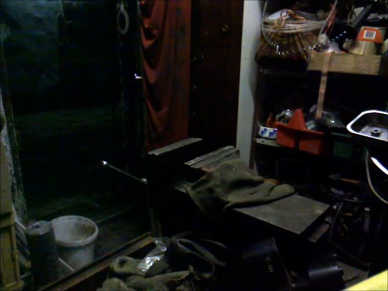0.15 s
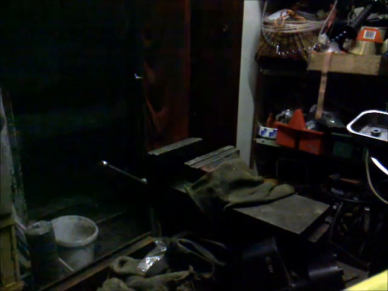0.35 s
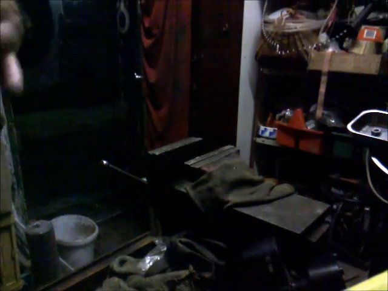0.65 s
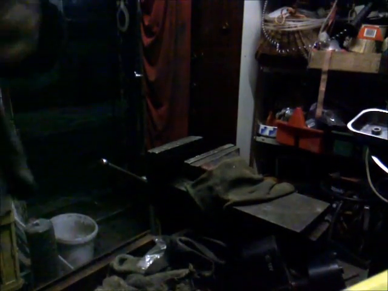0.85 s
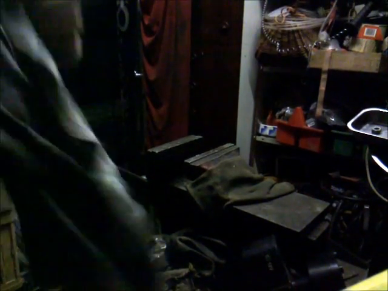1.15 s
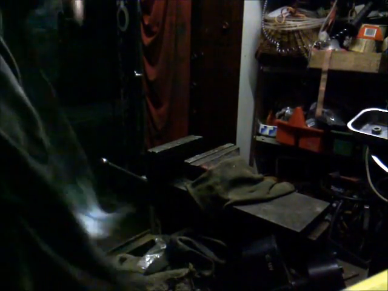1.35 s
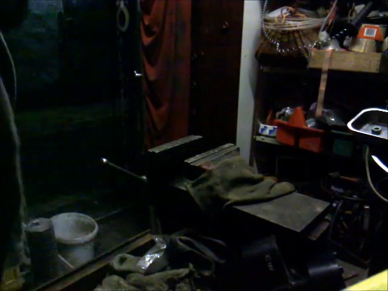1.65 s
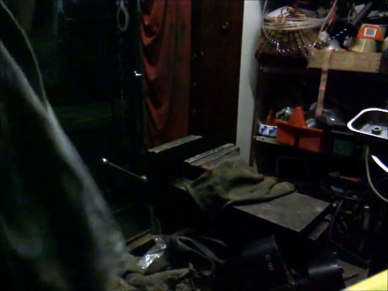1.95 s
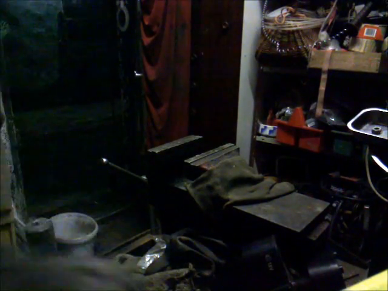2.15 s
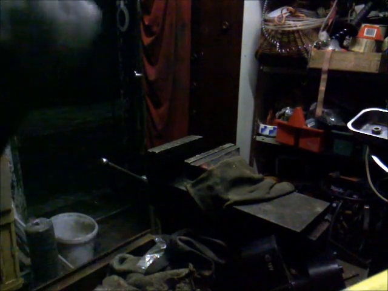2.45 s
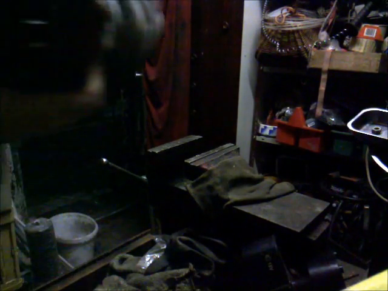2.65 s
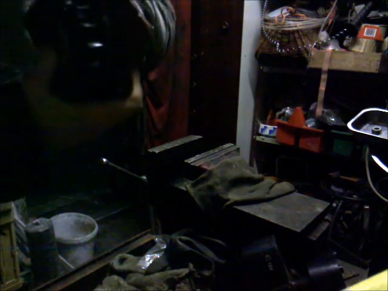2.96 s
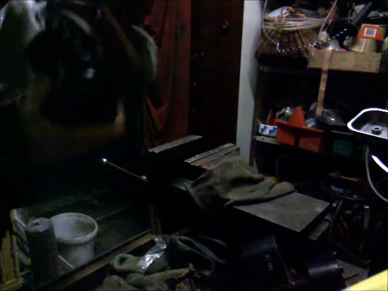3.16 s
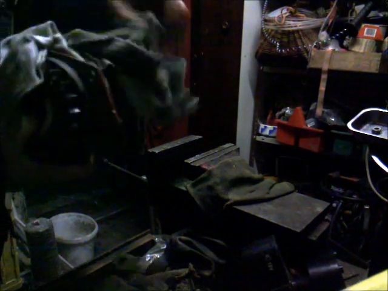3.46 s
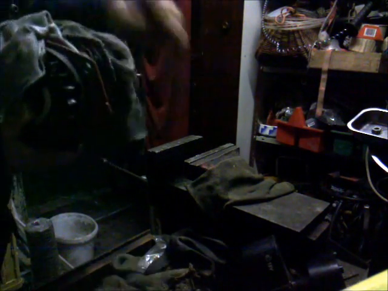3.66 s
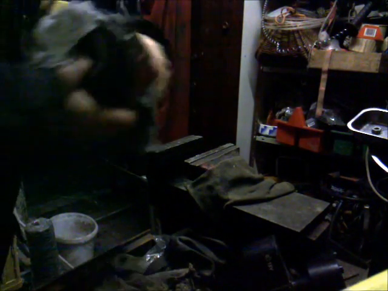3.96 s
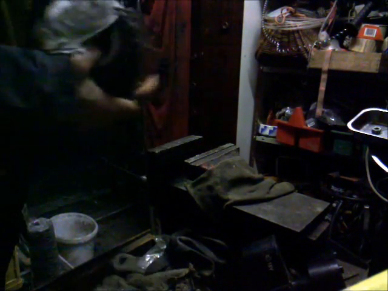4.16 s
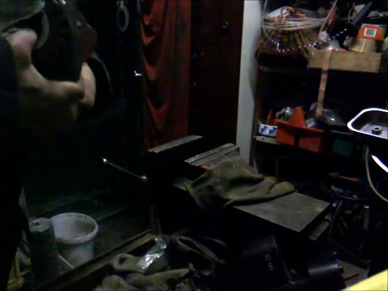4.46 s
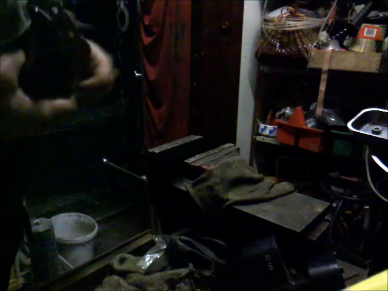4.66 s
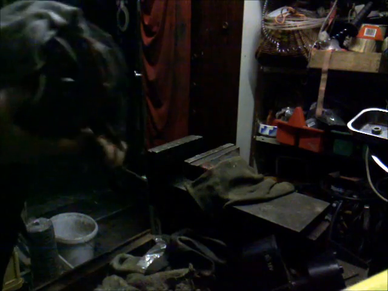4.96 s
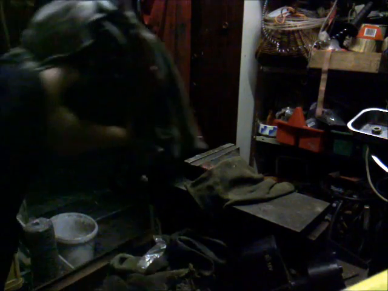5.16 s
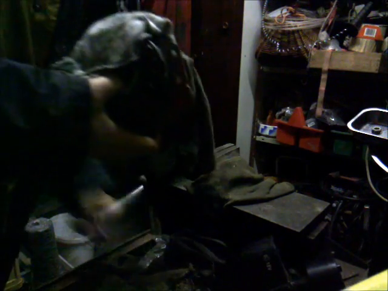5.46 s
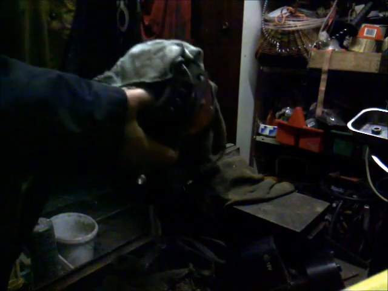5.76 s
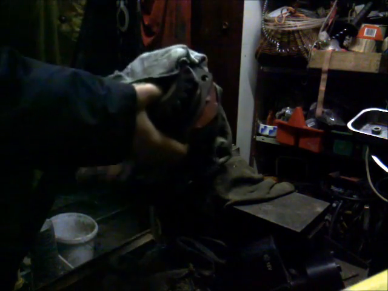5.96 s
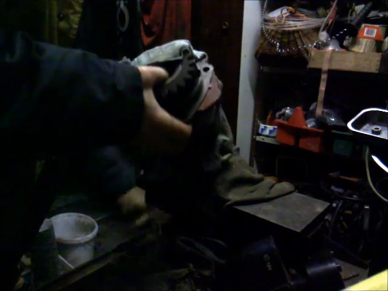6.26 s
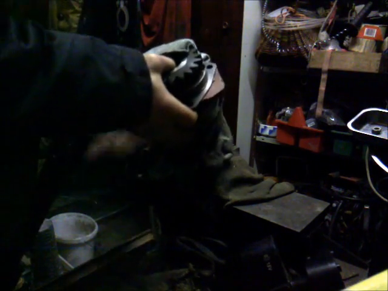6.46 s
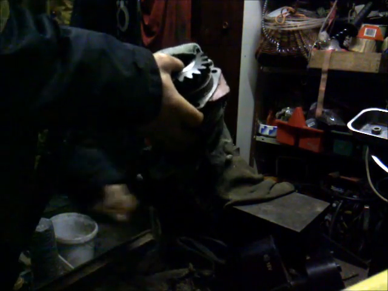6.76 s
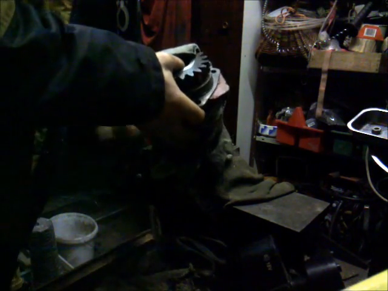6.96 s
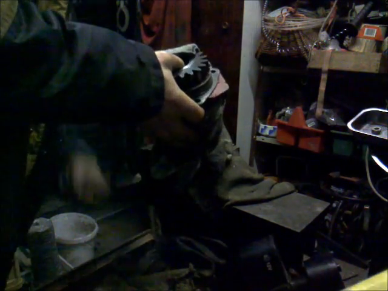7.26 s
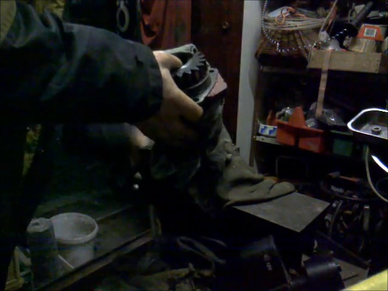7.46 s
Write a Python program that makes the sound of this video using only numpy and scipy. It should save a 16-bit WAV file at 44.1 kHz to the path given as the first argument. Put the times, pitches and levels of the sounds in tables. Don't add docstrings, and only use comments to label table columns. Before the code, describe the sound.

In a small cluttered workshop, a heavy steel part lands on a bench with a short ringing knock. Rag and sleeves rustle over metal with faint taps for several seconds. Then gears held in the hand are turned in jerky bursts, their teeth catching and grinding dully with clunks and a few bare clinks. Close, slightly hissy small camera microphone, very little echo.

```python
import sys
import numpy as np
from scipy import signal
from scipy.fft import rfft, irfft, next_fast_len
from scipy.io import wavfile
from scipy.ndimage import uniform_filter1d, map_coordinates

SR = 44100
rng = np.random.default_rng(int(sys.argv[2]) if len(sys.argv) > 2 else 0)


def wrap_up_sound(samples):
    columns = np.atleast_2d(samples).T
    tamed = np.clip(columns, -1, 1)
    steps = np.round(tamed * 32767).astype(np.int16)
    wavfile.write(sys.argv[1], SR, steps)


def invert_db(x):
    u = np.asarray(x, float) / 20
    return 10 ** u


N = 335601
CONTROL_STEP = 64

# pitch [Hz], level [dB per Hz].
GRIT_COLOUR = [(1500, -41.5), (3000, 5), (4600, 4), (6500, -11), (9000, -1.5), (11500, -6.5), (13500, -9.5)]


def unit(x):
    return x / np.sqrt(np.mean(x ** 2) + 1e-20)


def along(points, hz):
    f, v = np.transpose(points)
    return np.interp(np.log(hz + 1), np.log(f + 1), v)


def wobble(rate):
    knots = rng.standard_normal(int(N * rate / SR) + 4)
    return map_coordinates(knots, [np.arange(N) * rate / SR])


def filtered(x, response):
    m = next_fast_len(x.shape[-1] + min(8192, x.shape[-1] // 2))
    spectrum = rfft(x, m) * response(np.fft.rfftfreq(m, 1 / SR))
    return irfft(spectrum, m)[..., :x.shape[-1]]


def resonant(modes):
    def response(f):
        total = 0
        for k, (centre, width, db) in enumerate(modes):
            damping = 1j * f * width
            total = total + (-1) ** k * invert_db(db) * damping / (centre * centre - f * f + damping)
        return total
    return response


def grainy(lumps_db, rate):
    return rng.standard_normal(N) * invert_db(lumps_db * wobble(rate))


def tinted(x, colour):
    return unit(filtered(x, lambda hz: invert_db(along(colour, hz))))


def swells(rows):
    s, rise, fall, db = np.array(rows)[:, :4].T[..., None]
    late = np.arange(0, N, CONTROL_STEP) / SR - s
    drop_db = 20 * np.where(late < 0, -late / np.abs(rise), late / np.abs(fall))
    return invert_db(2 * (db - drop_db))


def smooth(control):
    return np.array([np.interp(np.arange(N), np.arange(0, N, CONTROL_STEP), c) for c in control])


def hiss():
    # pitch [Hz], level [dB per Hz].
    hiss_colour = [(50, -59), (85, -40), (115, 14), (180, -5.5), (300, -1.5), (550, -9), (900, -17),
                   (1400, -14.5), (2200, -13.5), (3200, -12), (4600, -18), (6500, -18.5), (9000, -12.5),
                   (11500, -10), (13500, -9)]
    return invert_db(-56.0) * tinted(rng.standard_normal(N), hiss_colour)


def rag():
    # strongest at [s], time to rise 20 dB [s], time to fall 20 dB [s], rustle level [dB].
    wipes = [(.2, .5, .16, -54), (.38, .2, .2, -61), (.43, .02, .1, -41), (.49, .2, .09, -44),
             (.53, .2, .045, -45), (.65, .3, .3, -62), (.8, .4, .12, -62), (1.3, .1, .08, -62),
             (1.65, .15, .3, -62), (1.86, .3, .1, -65), (2.06, .15, .6, -56.5), (2.46, .4, .45, -47.5),
             (2.6, .3, .3, -51), (2.76, .4, .12, -56), (3.12, .3, .5, -58), (3.42, .6, .45, -48),
             (3.63, .16, .6, -48), (3.82, .4, .3, -51), (3.97, .35, .13, -45), (4.21, .26, .46, -46),
             (4.6, .11, .18, -48), (4.86, .2, .3, -55), (5.03, .2, .5, -53), (5.19, .5, .2, -47),
             (5.56, .2, .3, -49), (5.66, .2, .1, -53), (6.0, .25, .3, -60), (6.27, .2, .5, -61),
             (6.48, .4, 1.2, -55), (6.8, .6, 1.2, -58), (7.3, 1.2, 1.9, -62)]
    # strongest at [s], time to rise 20 dB [s],
    # time to fall 20 dB [s], level [dB].
    sweep = [
        (4.23, .1, .2, -53),
        (4.275, .12, .14, -46.5),
        (4.31, .2, .12, -50),
    ]
    # pitch [Hz], level [dB per Hz].
    rustle_colour = [(800, -20.5), (2200, -2), (4600, 1.5), (6500, -5.5), (9000, 2), (11000, 4), (12400, 5),
                     (13500, -3.5)]
    shuffle_colour = [(40, -65.5), (78, -45), (100, 0), (250, 0), (600, -2), (1300, -4.5), (2500, -18.5),
                      (5000, -30)]

    rustle_db = smooth([10 * np.log10(swells(wipes).sum(axis=0))])[0]
    shuffle_db = -64 + 0.43 * (rustle_db + 60.5)
    rustle = invert_db(rustle_db + 0.72 * wobble(10)) * tinted(grainy(lumps_db=0.0, rate=240), rustle_colour)
    shuffle = invert_db(shuffle_db + 0.5 * wobble(11)) * tinted(grainy(lumps_db=-0.5, rate=82), shuffle_colour)

    hollow_modes = [(590, 450, -8.5), (950, 110, -0.5), (1140, 115, -5), (1700, 240, -14)]
    hollow = filtered(grainy(lumps_db=0.0, rate=60), resonant(hollow_modes))
    sweep_force = smooth(np.sqrt(swells(sweep)))[0]
    return rustle + shuffle + sweep_force * invert_db(4.5) * unit(hollow)


def drop():
    # start [s], level [dB].
    contacts = [
        (0.4045, -4),
        (0.4085, -11),
        (0.4123, -10),
        (.4275, -17),
    ]
    # pitch [Hz], level [dB], time to fall 60 dB [s].
    bench_tones = [(90, -9.5, 0.14), (293, -8.5, 0.05), (380, -19.5, .07), (490, -7, 0.036),
                   (575, 2.5, 0.062), (690, -5.5, .04), (794, -14, 0.06), (957, -7, 0.09),
                   (1530, -15, 0.11), (1930, -15, 0.082), (4600, -13, 0.084), (4860, -27, 0.08),
                   (6130, -14, 0.03), (6760, -17, 0.03)]
    # pitch [Hz], width [Hz], level [dB].
    bench_body = [(80, 37, 2), (300, 240, -5.5), (720, 420, -2), (2930, 510, -8), (4050, 880, -10),
                  (11700, 6700, -15.5)]
    caught_s, caught_db_per_s = .034, 1200

    out, shake, t = np.zeros(N), np.zeros(N), np.arange(SR // 2) / SR
    ring = sum(invert_db(level - 60 * t / t60) * np.sin(2 * np.pi * hz * t) for hz, level, t60 in bench_tones)
    landing_s = contacts[0][0]
    out[round(landing_s * SR):][:len(t)] -= invert_db(-13.5) * ring
    for s, db in contacts:
        fade = invert_db(-60 * t / 0.015) + 0.36 * invert_db(-60 * t / 0.099)
        shake[round(s * SR):][:len(t)] += invert_db(db + 3.0) * rng.standard_normal(len(t)) * fade
    held_for = np.maximum(np.arange(N) / SR - landing_s - caught_s, 0)
    return invert_db(-caught_db_per_s * held_for) * (out + filtered(shake, resonant(bench_body)))


def clinks():
    # start [s], peak [dB], ring pitch [Hz], ring level over tick [dB].
    touches = [
        (0.672, -32.5, 4640, -5.5),
        (0.677, -35, 5260, -11),
        (.689, -41.5, 5000, -9.5),
        (0.7058, -31.5, 4480, -18.5),
        (5.4694, -15, 4780, -10),
        (6.345, -30.5, 4700, -3.5),
        (7.198, -37, 4750, -4),
        (7.2234, -31, 4500, -1.5),
        (7.311, -32, 4470, -2),
    ]
    out, t = np.zeros(N), np.arange(SR // 10) / SR
    for s, db, hz, ring_db in touches:
        snap, rub = rng.standard_normal((2, len(t)))
        tick = np.diff(snap * invert_db(-60 * t / 0.029), prepend=0) / 3
        rub_fade = invert_db(-60 * t / 0.011) + 0.25 * invert_db(-60 * t / 0.06)
        ring = filtered(rub * rub_fade, resonant([(hz, 600, 17)]))
        out[round(s * SR):][:len(t)] += invert_db(db) * (tick + invert_db(ring_db) * ring)
    return out


def knocks(rows, t60, middling_bump_db, damping=0.11, late_s=0, per_second=6):
    out, t = np.zeros(N + SR), np.arange(SR // per_second) / SR
    s, db, hz, click_db = np.transpose(rows)[..., None]

    def peak(x):
        return x / np.abs(x).max(axis=1, keepdims=True)

    press = 1 - np.exp(-(t / 0.0006) ** 2)
    push, snap = rng.standard_normal((len(rows), 2, len(t))).swapaxes(0, 1)
    shove = 9 * np.sign(snap[:, :1]) * invert_db(-60 * t / 0.0092)
    blow = press * invert_db(-60 * t / np.clip(t60, .01, .3)) * (push + shove)
    thud_modes = [(hz, damping * hz, 0), (2.0 * hz, 0.45 * hz, -7), (3.1 * hz, 0.67 * hz, -15)]
    thud = filtered(blow, resonant(thud_modes))
    bump = filtered(blow, resonant([(212.3, 37, 0)]))
    snap_fade = invert_db(-60 * t / 0.006) + 0.099 * invert_db(-60 * t / 0.1)
    click = filtered(press * snap * snap_fade, lambda f: invert_db(along(GRIT_COLOUR, f)))

    bump_db = middling_bump_db + 0.42 * (db + 41) - db
    sounds = peak(thud) + invert_db(bump_db + 7.5) * peak(bump) + invert_db(click_db + 2.0) * peak(click)
    for start, sound in zip(s[:, 0] + late_s, invert_db(db) * sounds):
        out[round(start * SR):][:len(t)] += sound
    return out[:N]


def settles():
    # start [s], peak [dB], thud pitch [Hz], click over peak [dB].
    palm_thuds = [(.83, -51.5, 256, -30), (1.53, -56, 259, -29), (2.26, -51, 70, -29.5),
                  (2.98, -45, 260, -30), (4.25, -48, 110, -30), (4.65, -46, 276, -30),
                  (5.176, -34, 180, -40), (5.27, -37, 74.6, -40), (5.425, -30, 210, -40),
                  (5.474, -37, 207, -40), (7.232, -26, 213, -40), (7.392, -19, 220, -40),
                  (6.6, -42, 75, -30), (7.54, -41, 90, -30)]
    return knocks(palm_thuds, t60=0.31, middling_bump_db=-70.5)


def taps():
    # start [s], peak [dB], thud pitch [Hz], click over peak [dB].
    short_knocks = [(.272, -45, 720, -11), (.33, -58, 690, -5), (.668, -40.5, 420, -20), (.705, -39.5, 415, 0.5),
                    (1.596, -42, 395, -20.5), (1.885, -47.5, 394, -4.5), (1.917, -45.5, 670, -22),
                    (2.025, -33.5, 750, -24), (2.152, -44, 370, -8), (2.215, -52, 410, -15),
                    (2.791, -40.5, 880, -12), (2.895, -40, 690, -22), (3.248, -52, 1240, -6.5),
                    (3.601, -43.5, 1500, -5.5), (3.738, -42.5, 794, -15), (3.783, -44, 670, -19),
                    (4.585, -38.5, 1180, -16), (4.607, -39.5, 358, -16), (4.617, -38.5, 776, -14),
                    (4.959, -43.5, 440, -22), (5.043, -36, 537, -21), (5.087, -39.5, 573, -1),
                    (5.143, -41, 475, -13), (5.168, -26, 860, -22), (5.264, -38.5, 470, -17),
                    (5.323, -44, 350, -16), (3.678, -48, 500, -20), (3.713, -43, 720, -20),
                    (5.058, -41, 457, -20), (5.184, -29, 308, -25), (5.203, -32.5, 287, -25),
                    (5.433, -22, 247, -21), (5.64, -30.5, 466, -12.5), (5.8, -45, 550, -10),
                    (5.84, -32, 497, -29.5), (6.288, -26.5, 370, -27), (6.306, -22, 506, -21.5),
                    (6.63, -43, 900, -10), (6.708, -44, 735, -20), (6.901, -36, 665, -30)]
    return knocks(short_knocks, t60=0.05, middling_bump_db=-70.5, damping=.3, late_s=0.001196)


def catches():
    # start [s], peak [dB], thud pitch [Hz], click over peak [dB].
    tooth_bites = [(5.3959, -33.0, 480.0, -29.0), (5.4045, -31.0, 560.0, -28.0), (5.4193, -39.0, 440.0, -24.0),
                   (5.4546, -24.0, 500.0, -20.0), (5.4714, -18.0, 500.0, -5.0), (5.4811, -20.0, 570.0, -11.0),
                   (5.4997, -24.0, 860.0, -11.0), (5.5055, -25.0, 1300.0, -15.0), (5.5126, -25.0, 330.0, -17.0),
                   (5.5209, -29.0, 410.0, -14.0), (5.5322, -31.0, 280.0, -16.0), (5.5493, -37.0, 290.0, -14.0),
                   (5.6511, -31.0, 240.0, -16.0), (5.6612, -32.0, 510.0, -24.0), (5.8647, -24.0, 530.0, -21.0),
                   (5.8778, -26.0, 380.0, -17.0), (5.8904, -28.0, 460.0, -20.0), (5.905, -20.0, 560.0, -23.0),
                   (5.9178, -28.0, 570.0, -22.0), (5.927, -24.0, 240.0, -18.0), (5.9346, -24.0, 570.0, -17.0),
                   (5.9414, -26.0, 840.0, -14.0), (5.9479, -26.0, 1390.0, -17.0), (5.9566, -23.0, 820.0, -15.0),
                   (5.9692, -27.0, 970.0, -13.0), (5.9766, -26.0, 400.0, -20.0), (5.9905, -34.0, 420.0, -16.0),
                   (6.0043, -35.0, 250.0, -21.0), (6.0104, -32.0, 300.0, -24.0), (6.0202, -38.0, 510.0, -30.0),
                   (6.0471, -28.0, 570.0, -24.0), (6.0605, -23.0, 460.0, -26.0), (6.0719, -24.0, 560.0, -19.0),
                   (6.0797, -22.0, 610.0, -24.0), (6.086, -23.0, 590.0, -23.0), (6.0913, -28.0, 570.0, -22.0),
                   (6.267, -41.0, 400.0, -18.0), (6.2743, -39.0, 340.0, -19.0), (6.3199, -32.0, 450.0, -20.0),
                   (6.3299, -27.0, 560.0, -16.0), (6.337, -25.0, 420.0, -13.0), (6.3481, -27.0, 550.0, -10.0),
                   (6.3594, -25.0, 460.0, -14.0), (6.3685, -26.0, 530.0, -17.0), (6.3755, -29.0, 370.0, -13.0),
                   (6.388, -32.0, 310.0, -14.0), (6.3994, -36.0, 330.0, -10.0), (6.4187, -44.0, 260.0, -13.0),
                   (6.449, -41.0, 240.0, -15.0), (6.4814, -33.0, 530.0, -32.0),
                   (6.4874, -31.0, 520.0, -26.0), (6.4968, -32.0, 590.0, -25.0), (6.5154, -33.0, 590.0, -23.0),
             (6.5209, -34.0, 570.0, -22.0), (6.528, -37.0, 530.0, -19.0), (6.5537, -46.0, 240.0, -11.0),
             (6.7262, -35.0, 400.0, -24.0), (6.7339, -37.0, 400.0, -22.0), (6.7416, -35.0, 480.0, -22.0),
             (6.7494, -42.0, 520.0, -14.0), (6.7589, -36.0, 600.0, -21.0), (6.7661, -37.0, 430.0, -20.0),
             (6.7713, -34.0, 290.0, -25.0), (6.7817, -40.0, 530.0, -24.0), (6.7885, -40.0, 370.0, -28.0),
             (6.7969, -32.0, 560.0, -26.0), (6.8972, -45.0, 270.0, -19.0), (6.9370, -28.0, 420.0, -36.0),
             (6.9479, -27.0, 610.0, -33.0), (6.9692, -38.0, 650.0, -27.0), (6.9763, -34.0, 560.0, -26.0),
             (6.9826, -35.0, 390.0, -26.0), (7.1879, -27.0, 290.0, -18.0), (7.1964, -19.0, 650.0, -17.0),
             (7.2064, -19.0, 650.0, -16.0), (7.2321, -19.0, 720.0, -14.0), (7.2377, -20.0, 290.0, -18.0),
             (7.2434, -17.0, 620.0, -22.0), (7.2507, -23.0, 460.0, -20.0), (7.2578, -21.0, 420.0, -20.0),
             (7.2696, -23.0, 320.0, -19.0), (7.2874, -26.0, 1140.0, -16.0), (7.2932, -23.0, 760.0, -18.0),
             (7.307, -19.0, 540.0, -23.0), (7.3159, -24.0, 540.0, -12.0), (7.3291, -23.0, 430.0, -18.0),
             (7.3342, -25.0, 590.0, -15.0), (7.3406, -23.0, 550.0, -16.0), (7.351, -23.0, 540.0, -16.0),
             (7.3571, -21.0, 660.0, -19.0), (7.3667, -28.0, 580.0, -21.0), (7.3729, -22.0, 650.0, -20.0),
             (7.3782, -24.0, 540.0, -18.0), (7.3839, -24.0, 500.0, -19.0), (7.3931, -24.0, 560.0, -26.0),
             (7.4182, -27.0, 240.0, -29.0), (7.4331, -33.0, 270.0, -28.0)]
    return invert_db(3.5) * knocks(tooth_bites, t60=0.04, middling_bump_db=-49, damping=0.25,
                             late_s=-.001, per_second=10)


def slams():
    # start [s], peak [dB], thud pitch [Hz], click over peak [dB].
    stops = [(5.6605, -21.5, 546, -31), (5.8905, -18.5, 476, -11), (5.917, -15, 570, -16),
             (6.0195, -32, 560, -30), (6.0445, -27.5, 900, -17), (6.3235, -22, 446, -18),
             (6.4805, -20.5, 560, -24), (6.511, -32, 1100, -16), (6.7815, -29, 587, -27),
             (6.7875, -24, 390, -28), (6.9315, -17.5, 590, -22), (6.9685, -29.5, 686, -31),
             (7.366, -21, 610, -16)]
    return knocks(stops, t60=.012, middling_bump_db=-49, damping=.3, per_second=9.2)


def held(times):
    # grip start [s], grip end [s].
    grips = np.array([(0, .1), (.404, .556), (.672, .7), (.706, .74), (.82, .9), (1.8, 1.9), (3.6, 3.64),
                      (4.958, 5.025), (5.167, 5.3), (5.394, 5.57), (5.628, 5.72), (5.842, 6.033),
                      (6.043, 6.1), (6.268, 6.42), (6.445, 6.58), (6.722, 6.85), (6.89, 7.06), (7.18, 7.43),
                      (7.47, 7.61)])
    grab_db_per_s, let_go_db_per_s = 2996, 698
    t = np.arange(0, N, CONTROL_STEP) / SR
    away = np.abs(np.clip(times[:, None], *grips.T) - times[:, None])
    start, end = grips[away.argmin(axis=1)].T[..., None]
    early_db = grab_db_per_s * np.maximum(start - t, 0)
    late_db = let_go_db_per_s * np.maximum(t - end, 0)
    return invert_db(-2 * (early_db + late_db))


def gears():
    # strongest at [s],
    # time to rise 20 dB [s], time to fall 20 dB [s], grind level [dB], grit over grind [dB].
    skids = [
        (.01, .1, .15, -60, -30),
        (.43, .002, .02, -43, 6),
        (.49, .3, .24, -60, 13),
        (.672, .003, .1, -55, 6),
        (.708, .004, .05, -58, 4),
        (.865, .08, .08, -67, -1.5),
        (1.85, .12, .1, -66, -4),
        (7.56, .3, .4, -55, -30),
        (3.61, .05, .3, -61, -9),
        (4.965, .02, .2, -55, -30),
    ]
    turns = [(5.174, .01, .06, -42, -24), (5.265, .03, .05, -54.5, -12), (5.399, .008, .045, -37, -28),
             (5.479, .065, .09, -25, -5), (5.52, .07, .05, -36, -12), (5.66, .035, .043, -31, -17),
             (5.863, .035, .1, -32, -14), (5.905, .1, .12, -27, -14), (5.96, .12, .05, -32, -7),
             (6.018, .08, .025, -39.5, -40), (6.048, .01, .13, -33, -22), (6.084, .08, .035, -31, -20),
             (6.316, .045, .13, -30, -15), (6.355, .1, .09, -34, -4), (6.455, .02, .1, -46, -34),
             (6.488, .008, .03, -38, -30), (6.514, .008, .06, -41, -17), (6.726, .008, .2, -46, -38),
             (6.788, .07, .045, -39.5, -22), (6.905, .03, .15, -45, -34), (6.94, .008, .037, -35, -32),
             (6.968, .004, .05, -39, -16), (7.197, .022, .2, -27, -17), (7.232, .08, .25, -30, -7),
             (7.28, .1, .1, -30, -14), (7.34, .15, .1, -28, -12), (7.385, .16, .12, -28, -20)]
    # pitch [Hz], width [Hz], level [dB].
    gear_modes = [(144, 24, -4.5), (220.4, 49.5, 7.5), (328, 197, 2.5), (445, 99, 3.5), (584, 46, 2),
                  (734, 47, -4), (814, 48, 0), (943, 180, -10)]
    teeth_modes = [(1125, 110, -1), (1290, 110, 1), (1540, 170, -6), (1842, 160, -6), (2080, 200, -6),
                   (2370, 480, -6.5), (2950, 760, -12)]
    steeper = 1.55

    pushes = np.array([*skids, *turns])
    grind_db, grit_db = pushes[:, 3:4], pushes[:, 4]
    power = swells(pushes) * held(pushes[:, 0])
    teeth_db = np.minimum(-0.5 + 0.31 * grit_db, -3)
    steep = power ** steeper * invert_db(2 * (1 - steeper) * grind_db)
    tooth_power, grit_power = invert_db(2 * np.array([teeth_db, grit_db])) @ steep
    force, tooth_force, grit_force = smooth(np.sqrt([power.sum(axis=0), tooth_power, grit_power]))

    slips = (rng.random(N) < 900 / SR) * rng.standard_normal(N) * invert_db(2 * rng.standard_normal(N))
    clumps = invert_db(0.95 * wobble(45))
    chatter = (unit(slips) + 1.63 * grainy(lumps_db=2.0, rate=140)) * clumps

    def ring(drive, modes):
        return filtered(drive * chatter, resonant(modes)) / np.std(filtered(chatter, resonant(modes)))

    grind = invert_db(-2.5) * ring(force, gear_modes)
    teeth = invert_db(2.5) * ring(tooth_force, teeth_modes)
    grit = tinted(1.2 * chatter + grainy(lumps_db=7.5, rate=150), GRIT_COLOUR)
    sway = invert_db(-5.5) * ring(force, [(40.8, 8.0, 8.5)])
    return grind + teeth + invert_db(-1.4) * grit_force * grit + sway


def shop(x):
    # pitch [Hz], time to fall 60 dB [s].
    room_fade = [(200, 0.15), (1000, 0.034), (5000, 0.055), (12000, 0.044)]
    out, step = np.zeros(N + SR), SR // 5
    for start in range(0, N, step):
        hz, t, z = signal.stft(rng.standard_normal(SR // 4), SR, nperseg=256)
        fade = invert_db(-60 * t / along(room_fade, hz)[:, None])
        tail = signal.istft(z * fade, SR, nperseg=256)[1]
        wet = signal.fftconvolve(x[start:start + step], tail / np.linalg.norm(tail))
        out[start + 150:][:len(wet)] += wet
    return out[:N]


def widened(x):
    # pitch [Hz], right leads by [radians], likeness [0-1].
    stereo_turns = [(70, -3.1, .97), (140, -2.5, .9), (520, -1.5, .8), (860, -.85, .88), (1200, 0, .94),
                    (1600, .3, .95), (2250, 2.9, .5), (2900, 3.8, .85), (3300, 3.9, .8), (3620, 3.3, .5),
                    (4300, 2, .75), (5400, .2, .65), (6200, -.7, .35), (7400, .4, .4), (8270, 3.2, .55),
                    (9100, 6.1, .8), (9650, 6.28, .99), (10200, 6.8, .6), (11000, 9.4, .5), (11900, 12.2, .6),
                    (12400, 12.56, .99), (12950, 13, .6), (13800, 15.7, .85)]
    # time [s], right over left [dB].
    drift = [
        (4.6, 0),
        (5.6, 1),
        (7.6, 0.2),
    ]
    f, turn, alike = np.transpose(stereo_turns)

    hz, _, z = signal.stft(x, SR, nperseg=256)
    depth_db = along([(600, 1.1), (2000, 5.4), (3200, 3.5), (3800, 2.8)], hz)[:, None]
    patches = uniform_filter1d(rng.standard_normal(z.shape), size=3, axis=0)
    patches = unit(uniform_filter1d(patches, size=16, axis=1))
    strength = invert_db(depth_db * patches - 0.0058 * depth_db ** 2)
    scatter = strength * np.exp(2j * np.pi * rng.random(z.shape))
    other = np.sqrt(2) * signal.istft(z * scatter, nperseg=256)[1]
    other = np.pad(other, (128, 0))[:N]

    def shares(hz):
        spread = np.arccos(np.clip(np.interp(hz, f, alike), 0, 1)) / 2
        return np.array([np.cos(spread), np.sin(spread)])

    def half_turn(hz):
        return np.exp(.5j * np.interp(hz, f, turn) * np.array([[-1], [1]]))

    same, differ = filtered(np.array([x, other]), shares)
    lean_db = np.interp(np.arange(N) / SR, *np.transpose(drift))
    lean = invert_db(np.array([[-.5], [.5]]) * lean_db)
    return lean * filtered(np.array([same + differ, same - differ]), half_turn)


def scene():
    steel = gears() + slams() + catches() + taps() + clinks() + drop()
    return widened(steel + invert_db(-9.5) * shop(steel) + rag() + hiss() + settles())


def low_pass(x):
    return signal.sosfilt(signal.butter(12, 14800, fs=SR, output="sos"), x)


def record(dry):
    mix = filtered(dry, lambda hz: (1j * hz / (60 + 1j * hz)) ** 3 * (hz < 13900))
    return low_pass(mix)


dry = scene()
out = record(dry)
wrap_up_sound(out)
```